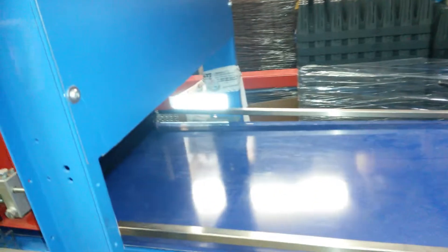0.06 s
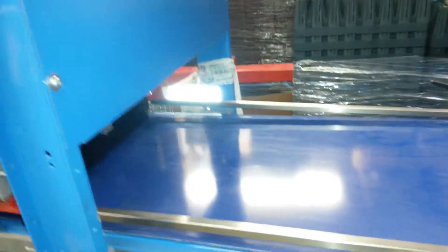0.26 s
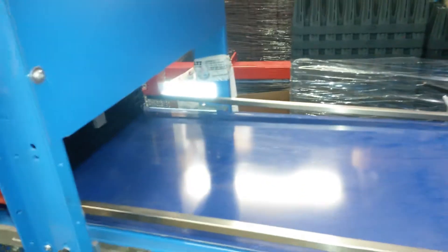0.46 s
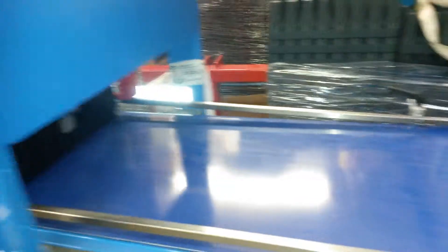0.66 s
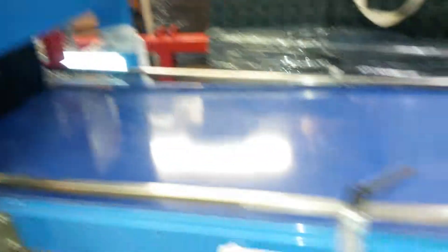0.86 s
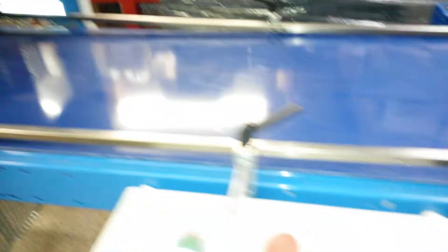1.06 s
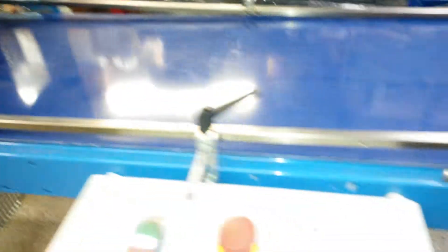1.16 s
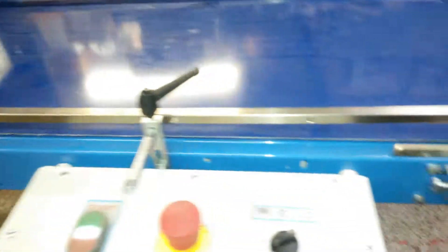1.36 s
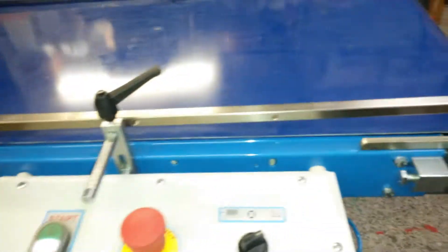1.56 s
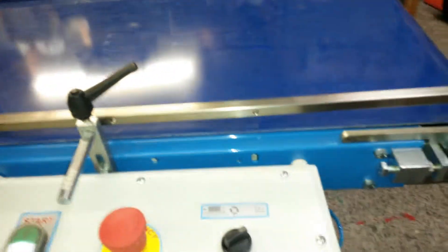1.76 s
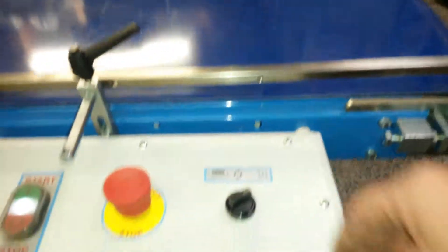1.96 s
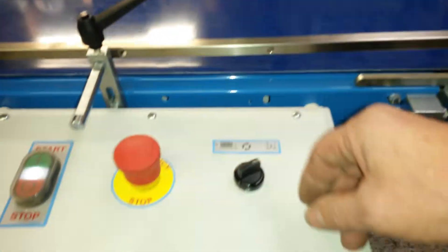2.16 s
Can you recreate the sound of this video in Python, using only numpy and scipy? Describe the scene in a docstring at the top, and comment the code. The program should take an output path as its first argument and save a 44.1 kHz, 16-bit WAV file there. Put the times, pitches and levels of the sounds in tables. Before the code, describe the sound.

Hard plastic trays clack and rattle close to a stereo microphone. Near silence with faint low hum, then a rapid bright clatter at 0.2-0.3 s, hollow knocks at 0.3 and 0.42, a light clack at 0.51. Soft bumps at 0.75-0.9, sharp clacks near 1.03, a faint scrape at 1.15-1.4, bright clacks with steel ringing at 1.41-1.5, then scattered crisp ticks from 1.64 to 2.03. Short workshop reverberation.

```python
"""Plastic trays beside a conveyor

Hard plastic trays clack, rattle and settle with small ticks in a workshop, close to a two-port microphone.
Each contact is a short coloured noise burst; some set the frame, a rail or a panel ringing as decaying sines.
Dull bumps are resonant noise; a soft scrape and fine rattle are made of many tiny stick-slip clicks.
The room answers for roughly half a second, over a low mains hum and faint air noise."""
import sys
import numpy as np
from scipy import signal
from scipy.fft import rfft, irfft
from scipy.io import wavfile

SR = 44100
rng = np.random.default_rng(int(sys.argv[2]) if len(sys.argv) > 2 else 0)


def output_pcm(signal):
    """Save a mono or channel-first signal as 16-bit PCM at the path in sys.argv[1].

    Samples are clipped to [-1, 1] before scaling.
    """
    pcm = np.clip(np.atleast_2d(signal).T, -1, 1) * 32767
    wavfile.write(sys.argv[1], SR, np.round(pcm).astype(np.int16))


N = 97020  # samples
T = np.arange(N) / SR  # s

# colour of tray on tray: (frequency [Hz], relative level [dB])
TRAY_COLOUR = [(88, -38), (150, 0.5), (229, -7.5), (350, -21), (401, 1), (515, -21), (578, -9.5),
               (1090, -4.5), (1670, -3.5), (2360, -3.5), (6810, -1), (15000, -22)]
CLACK_DECAY_S = 0.017


def undb(db):
    """Decibels to gain."""
    return 10 ** (np.asarray(db) / 20)


def unit(x):
    """Scale to an energy of one."""
    return x / np.sqrt(np.sum(x ** 2) + 1e-20)


def blow(x, db):
    """Scale a short burst so that its energy equals that level held for 4 ms."""
    return unit(x) * undb(db) * np.sqrt(.004 * SR)


def fade(t60, size=N):
    """Exponential decay by 60 dB in t60 seconds."""
    return np.exp(-np.log(1000) * T[:size] / max(t60, 1e-4))


def lookup(points, hz):
    """Read a table on a log-frequency axis."""
    f, v = np.array(points).T
    return np.interp(np.log(np.maximum(hz, 1)), np.log(f), v)


def band(x, lo, hi, order=2):
    """Band-pass."""
    return signal.sosfilt(signal.butter(order, [lo, min(hi, SR / 2 - 1)], "band", fs=SR, output="sos"), x)


def colour(x, points):
    """Causal (minimum-phase) filter with the response of a (frequency [Hz], level [dB]) table."""
    n = x.shape[-1]
    gain = undb(lookup(points, np.fft.rfftfreq(n, 1 / SR)))
    # folding the cepstrum gives the minimum phase
    cepstrum = irfft(np.log(gain), n)
    cepstrum[1:n // 2] *= 2
    cepstrum[n // 2 + 1:] = 0
    return irfft(rfft(x) * np.exp(rfft(cepstrum)), n)


def noise(size=N):
    """White noise."""
    return rng.standard_normal(size)


def diffuse():
    """Stereo noise, alike in the bass and unrelated in the treble."""
    hz = np.fft.rfftfreq(N, 1 / SR)
    likeness = .92 / (1 + (hz / 1200) ** 2)
    mid = irfft(rfft(noise()) * np.sqrt(1 + likeness), N)
    side = irfft(rfft(noise()) * np.sqrt(1 - likeness), N)
    return np.array([mid + side, mid - side]) / np.sqrt(2)


def add(out, x, s):
    """Mix a sound in at a time."""
    i = max(int(s * SR), 0)
    n = min(x.shape[-1], N - i)
    out[..., i:i + n] += x[..., :n]


def ports(x, pan_db):
    """Two microphone ports: the left hears first, and each hears scatter from nearby surfaces."""
    lag_s, scatter_db, scatter_t60_s = .00015, -3.5, 0.0092
    late = np.r_[np.zeros(int(lag_s * SR + .5)), x][:len(x)]
    pair = []
    for direct in (x, late):
        surfaces = unit(noise(size=256) * fade(scatter_t60_s, size=256))
        scatter = signal.fftconvolve(direct, surfaces)[:len(x)]
        pair.append(unit(direct + undb(scatter_db) * scatter))
    balance = undb(np.array([[pan_db], [-pan_db]]) / 2)
    return np.array(pair) * np.linalg.norm(x) * balance


def snap(decay_s):
    """A burst of a few milliseconds: noise flattened to an even spectrum, then faded."""
    spectrum = rfft(noise(size=2048) * fade(decay_s, size=2048))
    flat = irfft(spectrum / (np.abs(spectrum) + 1e-12), 2048)
    return flat * fade(2 * decay_s, size=2048)


def catches():
    """Stick-slip clicks at random moments, of uneven size and either sign."""
    per_s, spread_db = 700, 3
    excess = np.minimum(rng.exponential(size=N), np.pi)
    sizes = np.sign(noise()) * undb(spread_db * excess)
    return (rng.random(N) < per_s / SR) * sizes


def ringing(modes):
    """Decaying modes of a struck part, each starting in a random phase."""
    x = np.zeros(N)
    for hz, db, t60 in modes:
        x += undb(db) * fade(t60) * np.sin(2 * np.pi * (hz * T + rng.random()))
    return x


def air():
    """Steady, faint air noise, as diffuse noise with a fixed colour."""
    # (frequency [Hz], relative level [dB])
    air_colour = [(25,-0.5), (50,-7.5), (98,6), (130,1.5), (230,-4), (700,-8), (3000,-16), (10000,-13),
                  (15000,-17.5)]
    x = colour(diffuse(), air_colour)
    return x / x.std() * undb(-61.5)


def hum():
    """Mains hum: sines that waver in level and phase while they slowly recede."""
    # hum partials: (frequency [Hz], level at 1 s, before the waver [dB])
    partials = [(98, -66.5), (199.5, -70.5), (300.5, -73.5)]
    waver_db, fall_db_per_s = 2.8, 5.5
    out = np.zeros(N)
    for hz, db in partials:
        swell, drift = band(noise(), 2, 14), band(noise(), 2, 14)
        level = db + waver_db * swell / swell.std() - fall_db_per_s * (T - 1)
        phase = 2 * np.pi * hz * T + .5 * drift / drift.std()
        out += np.sqrt(2) * undb(level) * np.sin(phase)
    return out


def workshop(send):
    """Ringing frame, close reflections, and a tail whose decay time depends on frequency."""
    # reverberation: (frequency [Hz], t60 [s])
    room_t60 = [(150, 1), (500, 0.4), (1500, 0.38), (4000, 0.59), (7000, 0.41), (13000, 0.27)]
    # colour of the tail: (frequency [Hz], relative level [dB])
    room_colour = [(150, 4.5), (500, 0.5), (1500, 2.5), (4000, -4.5), (7000, 4)]
    # low mode of the frame: (frequency [Hz], relative level before halving [dB], t60 [s])
    frame_modes = [(385.4, -29, 0.17)]
    early_db, early_t60_s, onset_s = 0, 0.14, 0.0023
    edges, field = np.geomspace(80, 18000, 13), diffuse()
    tail = np.zeros((2, N))
    for lo, hi in zip(edges, edges[1:]):
        tail += band(field, lo, hi, order=3) * fade(lookup(room_t60, np.sqrt(lo * hi)))
    early = unit(diffuse() * fade(early_t60_s))
    response = unit(colour(tail, room_colour)) + undb(early_db) * early
    for hz, db, t60 in frame_modes:
        response += undb(db) * unit(ringing([(hz, 0, t60)])) / 2
    response *= np.sqrt(2) * (1 - np.exp(-T / onset_s))
    return signal.fftconvolve(send[None], response, axes=1)[:, :N]


def bumps():
    """Soft heavy contacts: noise in a broad resonance that swells quickly and dies away."""
    # dull bumps: (time [s], level before attack and decay [dB], centre [Hz], t60 [s])
    contacts = [(0.002, -51, 418, 0.21), (0.089, -43.5, 179, 0.44), (0.275, -42, 184, 0.49),
                (0.415, -40.5, 190, 0.43), (0.742, -47, 470, 0.42), (0.765, -43.5, 520, 0.26),
                (0.783, -48, 137, 0.43), (0.794, -38.5, 1400, 0.2), (0.874, -43, 380, 0.3),
                (0.875, -35.5, 1600, 0.13), (0.975, -47.5, 516, 0.36), (1.025, -51, 176, 0.21),
                (1.612, -44.5, 1460, 0.21)]
    attack_s, width = 0.0031, 1.463  # width: ratio of band edge to centre
    out = np.zeros((2, N))
    for s, db, hz, t60 in contacts:
        x = band(diffuse(), hz / width, hz * width)
        envelope = fade(t60) * (1 - np.exp(-T / attack_s))
        add(out, x / x.std() * undb(db) * envelope, s)
    return out


def scrape():
    """Something slides a short way off: dense catches in a hollow resonance, smeared by reflections."""
    # (frequency [Hz], relative level [dB])
    scrape_colour = [(350,-11), (850,5), (1300,-9.5), (2300,-6.5), (5000,-25)]
    start_s, attack_s, length_s, release_s = 1.141, 0.053, 0.15, .2
    grain = signal.fftconvolve(catches()[None], diffuse() * fade(CLACK_DECAY_S), axes=1)[:, :N]
    x = band(colour(grain, scrape_colour), scrape_colour[0][0], SR / 2)
    since = T - start_s
    rise = np.clip(since / attack_s, 0, 1)
    release = np.exp(-np.log(1000) * np.maximum(since - length_s, 0) / release_s)
    return x / x.std() * undb(-48) * rise * release


def rattle():
    """Plastic slips in many tiny catches, too light to move the low modes."""
    # spells of fine rattle: (time [s], length [s], level [dB])
    spells = [(0.0, 0.018, -47), (0.085, 0.028, -55), (0.202, 0.047, -31.5), (0.51, 0.017, -40),
              (0.699, 0.11, -56.5), (0.785, 0.015, -46.5), (0.865, 0.017, -45.5), (1.04, 0.063, -41),
              (1.43, 0.057, -44)]
    low_hz, room_db = 1090, 2
    x = np.zeros(N)
    for s, length, db in spells:
        clicks = catches()[:8192] * (T[:8192] < length)
        spell = band(colour(clicks, TRAY_COLOUR), low_hz, SR / 2)
        add(x, unit(spell) * undb(db) * np.sqrt(length * SR), s)
    return ports(x, 0), x * undb(room_db)


def metal(hits, modes):
    """A metal part rings on after each blow; the two ports share only part of its phase."""
    out = np.zeros((2, N))
    for s, db in hits:
        shared = ringing(modes)
        pair = [blow(shared + ringing(modes) / 2, db) for _ in range(2)]
        add(out, np.array(pair), s)
    return out


def panel():
    """Some blows reach a sheet-metal panel, which rings in a few modes."""
    # blows: (time [s], level [dB])
    hits = [(0.875,-36.5), (1.023,-33)]
    # (frequency [Hz], relative level [dB], t60 [s])
    modes = [(1384,1,0.24), (1454,-4,0.33), (2583,-2,.4)]
    return metal(hits, modes)


def guide_rail():
    """Some blows reach the steel guide rail, whose higher modes ring on."""
    # blows: (time [s], level [dB])
    hits = [(1.415,-24.5), (1.447,-26)]
    # (frequency [Hz], relative level [dB], t60 [s])
    modes = [(2653,-4,0.43), (3920,-4,0.52), (4600,-3.5,0.52), (5686,1,0.33), (6900,-0.5,0.32),
             (6880,3.5,0.4)]
    return metal(hits, modes)


def knocks():
    """Some blows set the hollow frame ringing around a kilohertz, with a softened start."""
    # knocks on the frame: (time [s], level [dB])
    hits = [(0.2775,-29.5), (0.3065,-31), (0.409,-24), (0.429,-24)]
    # modes of the hollow frame: (frequency [Hz], relative level [dB], t60 [s])
    modes = [(886,2.5,0.055), (1007,5.5,0.049), (1133,2.5,0.17)]
    room_db = -8
    near, send = np.zeros((2, N)), np.zeros(N)
    for s, db in hits:
        x = blow(ringing(modes) * (1 - fade(0.013)), db)
        add(near, x, s)
        add(send, x * undb(room_db), s)
    return near, send


def ticks():
    """A plastic edge snaps free and rings very briefly; the room gets more of the snap."""
    # settling edges: (time [s], level before the offset [dB], centre [Hz], left over right [dB],
    # room send [dB])
    edges = [(0.9787, -33, 5500, -12, 0), (1.0588, -19, 6630, -3, 8), (1.4141, -17.5, 5690, -12, 1),
             (1.4227, -14.5, 5670, -13.5, -13), (1.6428, -17.5, 7050, -8.5, -3),
             (1.735, -24, 6130, -14.5, -2.5), (1.7611, -16.5, 6000, -2.5, -8),
             (1.8223, -31.5, 6300, -15, -5.5), (1.9103, -18.5, 7180, -17.5, -3.5),
             (1.97, -20, 6160, -13, -4.5), (2.0041, -34, 6240, -25, -24), (2.0252, -25.5, 6700, 1, -5.5)]
    # resonances of an edge: (multiple of its centre, relative level [dB], t60 [s])
    edge_modes = [(.69, -6, 0.014), (.84, -3, 0.016), (1.0, 4.5, 0.0085), (1.18, -1.5, 0.012),
                  (1.35, -10, 0.0045)]
    # (frequency [Hz], relative level [dB])
    tick_colour = [(300, -20), (2500, -12.5), (4200, 8), (8000, 0), (12000, -17.5)]
    offset_db, crack_db, crack_decay_s, room_ring_db = -8.5, -4.5, 0.0041, -7
    near, send = np.zeros((2, N)), np.zeros(N)
    for s, db, hz, pan, wet in edges:
        ring = unit(ringing([(hz * k, g, t60) for k, g, t60 in edge_modes])[:2048])
        crack = undb(crack_db) * unit(snap(crack_decay_s))
        direct = blow(colour(ring + crack, tick_colour), db + offset_db)
        add(near, ports(direct, pan), s)
        to_room = colour(undb(room_ring_db) * ring + crack, tick_colour)
        add(send, blow(to_room, db + offset_db + wet), s)
    return near, send


def crack_burst(decay_s, levels):
    """A short burst in the colour of the trays, weighted by band; more sizzle over body is brighter."""
    # crack, thump, body and sizzle bands: (low edge [Hz], high edge [Hz])
    bands = [(3200, 9000), (200, 700), (700, 3200), (9000, 14500)]
    offset_db, hardness = -4.5, 0.47  # hardness: dB per octave for each dB of sizzle over body
    _, _, body, sizzle = levels
    tilt = hardness * (sizzle - body)
    pivot_hz = bands[0][0]  # the tilt acts above this
    tilted = [(hz, db + tilt * np.log2(max(hz, pivot_hz) / pivot_hz)) for hz, db in TRAY_COLOUR]
    burst = colour(snap(decay_s), tilted)
    return sum(blow(band(burst, lo, hi, order=3), db + offset_db) for (lo, hi), db in zip(bands, levels))


def clacks():
    """Tray against tray: a crack of a few milliseconds, with its own weight of thump, body and sizzle."""
    # tray contacts: (time [s], crack [dB], thump [dB], body [dB], sizzle [dB], left over right [dB],
    # room send [dB]); the four band levels are before their offsets
    contacts = [(0.1911,-26,-53,-32,-39.5,-14,-2), (0.2016,-12.5,-36.5,-22,-23.5,-3,-1.5),
                (0.210,-18,-43,-36,-26,2,-4), (0.215,-23,-55,-27.5,-27.5,-16,-1),
                (0.2267,-15,-33,-22,-32,-5,0.5), (0.238,-13.5,-41,-34,-35,-3,-4),
                (0.244,-15,-62,-30,-24.5,-9,0.5), (0.2488,-17,-68,-34,-29,-14.5,-4),
                (0.278,-20.5,-54,-28.5,-44,-9,0), (0.3054,-22.5,-36,-22,-52,-8,-4),
                (0.4094,-14.5,-35,-23.5,-27.5,-12,-2), (0.412,-23,-33.5,-20.5,-29,7.5,0),
                (0.4272,-17,-30.5,-18,-28.5,-8.5,-13), (0.5105,-25.5,-49,-33,-46,-12.5,-5),
                (0.7819,-33,-32.5,-36,-45,-2,-4), (0.8725,-28.5,-45.5,-32.5,-57,-14.5,4.5),
                (1.022,-18.5,-36.5,-25,-28.5,-3.5,-4.5), (1.0371,-11,-84,-38,-20,-0.5,-5),
                (1.4142,-17.5,-58,-25,-67,-10,0), (1.447,-13,-77,-33,-28,-6.5,-3),
                (1.4942,-24,-77,-36.5,-52,-14.5,1), (1.6079,-31.5,-90,-62,-86,-11,2)]
    skirt_db, send_decay_s = -1.5, 0.005  # offset of the bands around the crack; burst into the room
    near, send = np.zeros((2, N)), np.zeros(N)
    for s, crack, thump, body, sizzle, pan, wet in contacts:
        levels = [crack, thump + skirt_db, body + skirt_db, sizzle + skirt_db]
        add(near, ports(crack_burst(CLACK_DECAY_S, levels), pan), s)
        add(send, crack_burst(send_decay_s, levels) * undb(wet), s)
    return near, send


def scene():
    """All contacts, direct and through the room, over the hum and air of the workshop."""
    background = air() + hum()
    soft = bumps() + scrape()
    rings = panel() + guide_rail()
    near, send = (sum(part) for part in zip(rattle(), knocks(), ticks(), clacks()))
    return background + workshop(send) + soft + rings + near


def record(dry):
    """The recorder limits at full scale and cuts the top above 14.7 kHz."""
    low_pass = signal.ellip(8, .2, 70, 14700, fs=SR, output="sos")
    return signal.sosfilt(low_pass, np.clip(dry, -1, 1))


dry = scene()
out = record(dry)
output_pcm(out)
```